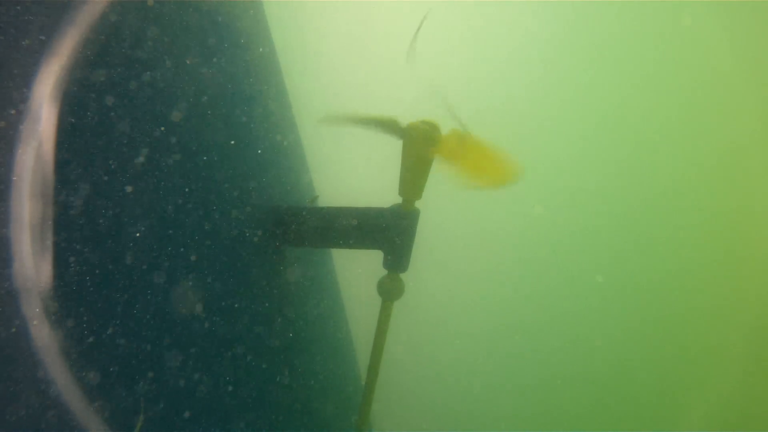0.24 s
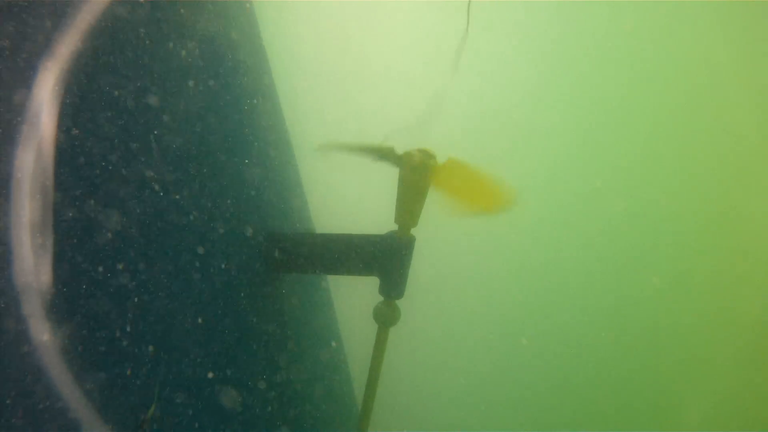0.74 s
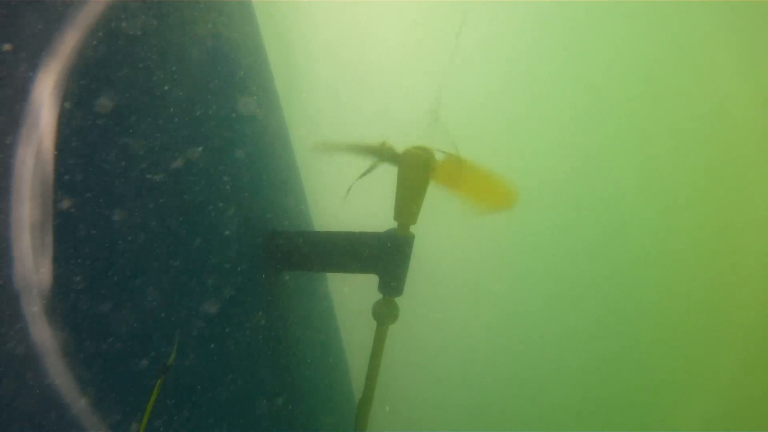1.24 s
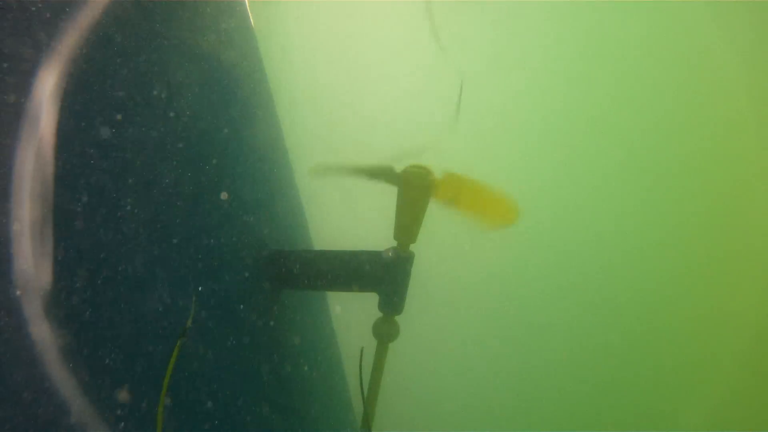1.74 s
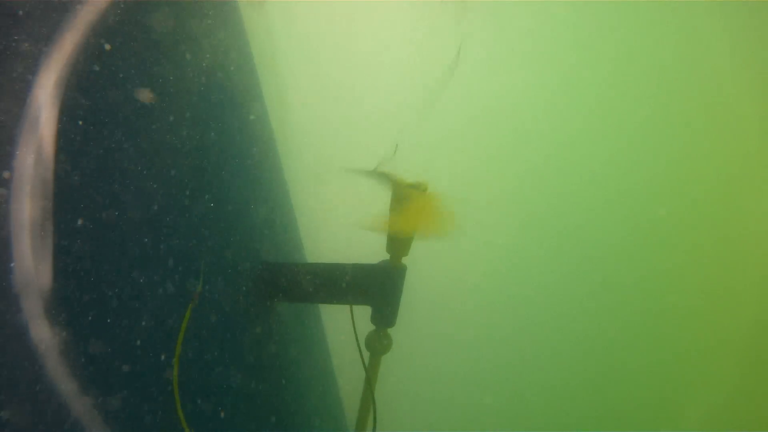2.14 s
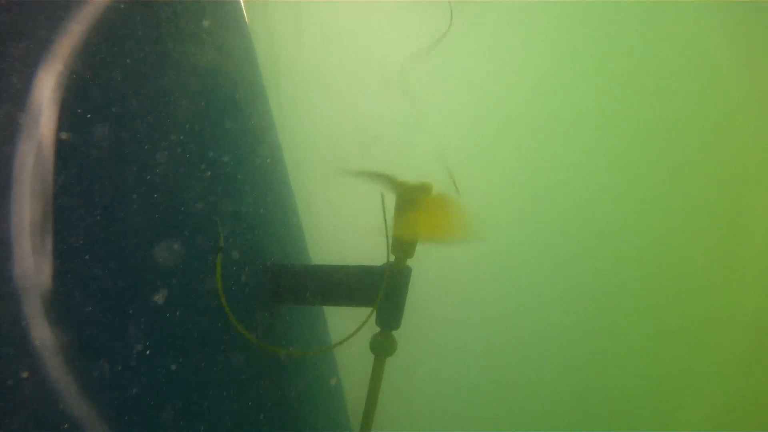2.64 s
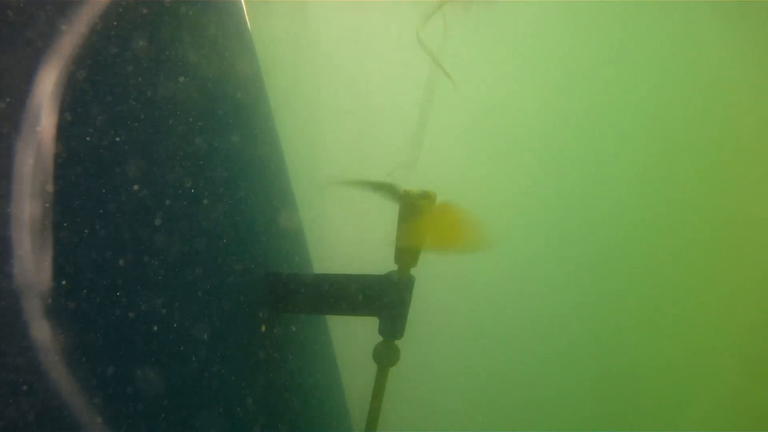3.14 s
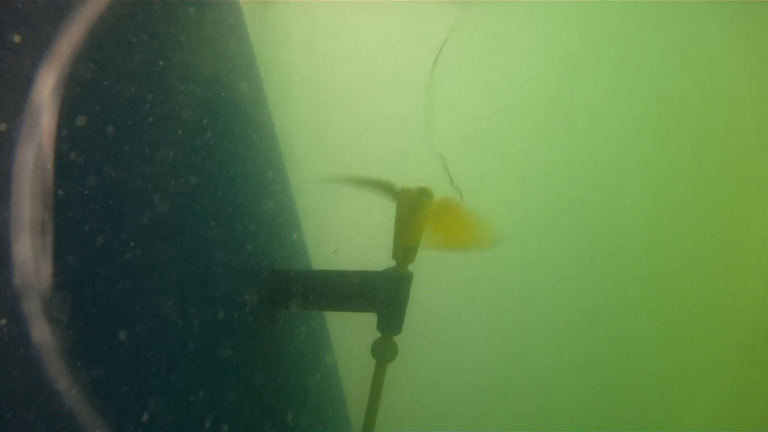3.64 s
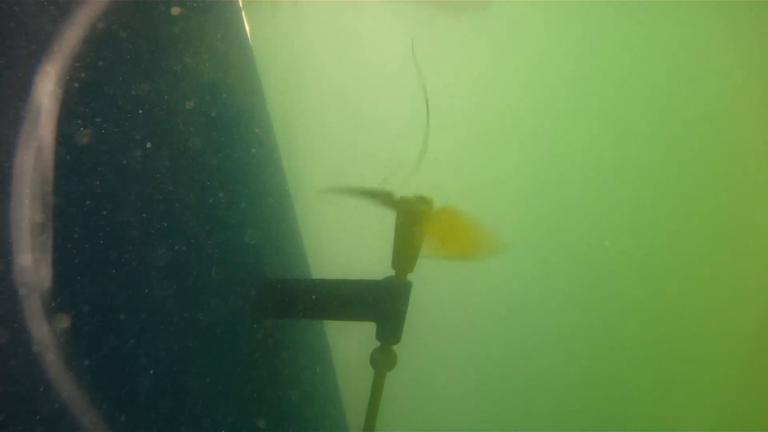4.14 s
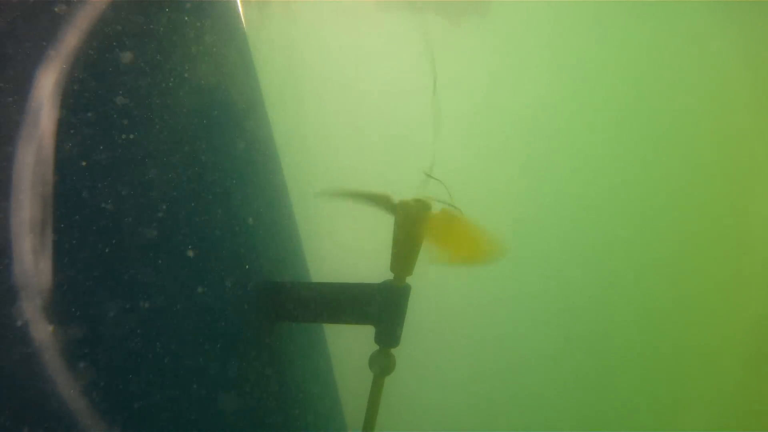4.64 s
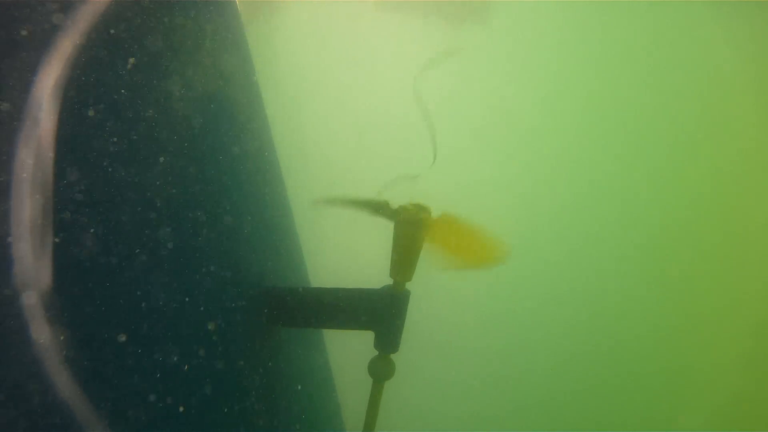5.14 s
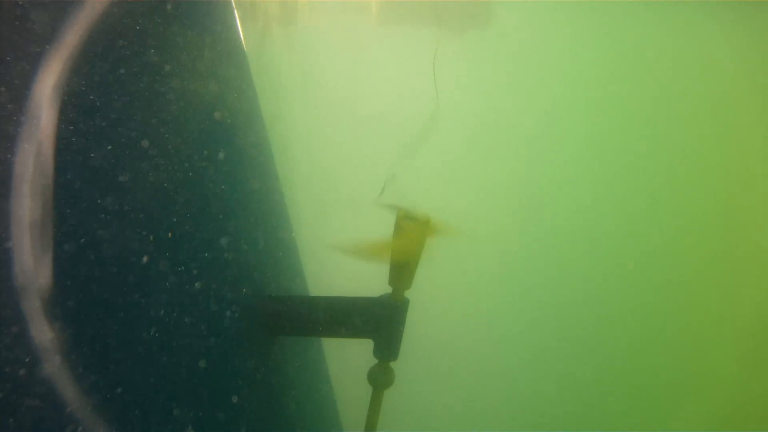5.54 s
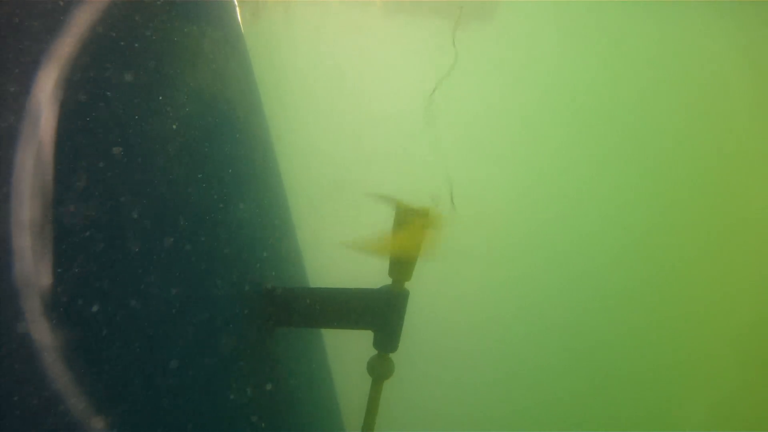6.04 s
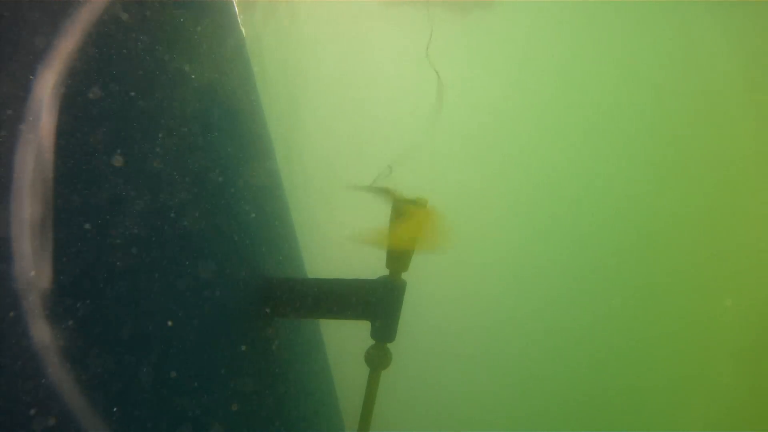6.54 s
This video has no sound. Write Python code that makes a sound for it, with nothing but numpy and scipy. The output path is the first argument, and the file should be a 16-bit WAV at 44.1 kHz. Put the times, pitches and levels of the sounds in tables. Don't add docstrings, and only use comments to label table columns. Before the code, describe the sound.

Harsh, gritty bubbling roar of a spinning propeller heard close underwater, fluttering rapidly, with hollow thuds, low hull thrum and steady motor drone.

```python
import sys
import numpy as np
from scipy import signal
from scipy.fft import rfft, irfft
from scipy.io import wavfile

SR = 44100
rng = np.random.default_rng(int(sys.argv[2]) if len(sys.argv) > 2 else 0)


def file_out(sig):
    cols = np.atleast_2d(sig).T
    lim = np.clip(cols, -1, 1)
    pcm = np.round(lim * 32767).astype(np.int16)
    wavfile.write(sys.argv[1], SR, pcm)


def invert_db(level):
    return 10 ** (np.asarray(level, dtype=float) / 20)


N = 298998
TIME = np.arange(N) / SR
ENGINE_HZ, SHAFT_HZ = 15.396, 12.94

# t/s, low ring level/dB, high ring level/dB
SURGES = [(0.032, -4, -14), (0.163, -5, -12), (0.372, -3, -15), (0.697, -5, -14), (0.954, -4, -10),
          (1.241, -6, -15), (1.392, -4, -12), (1.842, -8, -7), (1.973, -6, -5), (2.231, -5, -11),
          (2.446, -6, -7), (2.677, -6, -8), (2.707, -4, -17), (3.002, -7, -4), (3.074, -4, -8),
          (3.102, -6, -13), (3.256, -4, -15), (3.462, -4, -12), (3.64, -5, -12), (3.852, -6, -14),
          (4.028, -2, -14), (4.465, -7, -13), (4.635, -6, -8), (4.987, -5, -8), (5.113, -5, -12),
          (5.311, -3, -15), (5.469, -6, -13), (5.575, -2, -11), (6.477, -5, -12), (6.543, -4, -15)]


def rms_one(x):
    return x / np.sqrt(np.mean(x ** 2) + 1e-20)


def drift(rate):
    r = np.exp(-40 * np.pi * rate / SR)
    slow = signal.lfilter([1], [1, -2 * r, r * r], rng.standard_normal(N // 20 + 3002))
    slow = slow[3000:]
    return np.interp(np.arange(N) / 20, np.arange(len(slow)), rms_one(slow - slow.mean()))


def resonate(x, hz, width_hz):
    r = np.exp(-np.pi * width_hz / SR)
    feedback = [1, -2 * r * np.cos(2 * np.pi * hz / SR), r * r]
    return signal.lfilter([(1 - r * r) / 2, 0, (r * r - 1) / 2], feedback, x)


def in_time(rows):
    s, *columns = np.transpose(rows)
    return [np.interp(TIME, s, c) for c in columns]


def humps(rows, fall_share):
    total_db = 0
    for s, db, rise_s in rows:
        side_s = rise_s * np.where(TIME > s, fall_share, 1)
        total_db = total_db + db * np.exp(-.5 * ((TIME - s) / side_s) ** 2)
    return total_db


def collapses(per_s, spread_db):
    sizes = invert_db(spread_db * np.minimum(rng.exponential(1, N), 4)) * rng.choice([-1, 1], N)
    return rms_one(sizes * (rng.random(N) < per_s / SR))


def cavitation(level_db):
    # f/Hz, width/Hz, level/dB, throb once a turn/dB, its lag/turns,
    # throb per blade/dB, its lag/blades
    resonances = [(495.6, 163, -8.5, 4.5, 0.38, -0.5, 0.29), (581.4, 73, 3.5, 1.5, 0.11, 4.5, 0.4),
                  (663, 104, 5.5, 3.5, 0.073, 2.3, 0.41), (729.5, 182, 1, -1.5, 0.22, 0.5, 1),
                  (1370, 290, -1.5, 1.03, 0.91, 1, 0.15), (1794, 260, -6, 0.9, 0.46, 3, 0.081),
                  (2239, 462, 1.5, 1.5, 0.58, 1.75, 0.32), (2695, 250, -11, 0.5, 0.72, 1.5, 0.95),
                  (3387, 385, -7.5, 0, 0.54, 1, 0.47), (4380, 1120, -18, 1, 0.5, 3.5, 0.47),
                  (5180, 3440, -11.5, -0.7, 0.64, -0.4, 0.3)]
    # f/Hz, width/Hz, depth/dB
    cancellations = [(1030, 160, -8.0), (1690, 120, -7.0), (2565, 90, -9.0), (3120, 140, -11.0),
                     (3930, 120, -8.0), (4120, 400, -3.0)]
    near = collapses(2500.5, spread_db=3.5)
    far = collapses(9000.5, spread_db=2.1)
    cloud, out = drift(31.0), 0
    firing_db = .5 * np.cos(2 * np.pi * (3 * ENGINE_HZ * TIME - .15))
    for hz, width_hz, db, turn_db, turn_lag, blade_db, blade_lag in resonances:
        throb_db = turn_db * np.cos(2 * np.pi * (SHAFT_HZ * TIME - turn_lag))
        throb_db = throb_db + blade_db * np.cos(2 * np.pi * (2 * SHAFT_HZ * TIME - blade_lag))
        patch_db = .9 * cloud + .5 * drift(45)
        bubbles = 0.8 * near + 0.59 * np.roll(far, rng.integers(N))
        bubbles = bubbles * invert_db(throb_db + patch_db + firing_db)
        ring = resonate(resonate(bubbles, hz, width_hz), hz, width_hz)
        out = out + invert_db(db) * rms_one(ring)
    for hz, width_hz, depth_db in cancellations:
        out = out - (1 - invert_db(depth_db)) * resonate(out, hz, width_hz)
    return invert_db(level_db - 0.48) * out


def surges(roar):
    out = roar.copy()
    ms = (np.arange(1000) - 500) / SR * 1000
    for (s, low_db, high_db), (pitch, length, turn) in zip(SURGES, rng.random((len(SURGES), 3))):
        swell = np.exp(-.5 * (ms / (1.5 + 1.0 * length)) ** 2)
        low = invert_db(low_db + 1.5) * np.cos(2 * np.pi * ((.58 + .16 * pitch) * ms + turn))
        high = invert_db(high_db - 2) * np.cos(2 * np.pi * (2.15 + .25 * length) * ms)
        start = round(s * SR) - 470
        masked = out[start:start + 1000] * (1 - .7 * swell ** .3)
        out[start:start + 1000] = masked + swell * (low + high)
    return out


def machinery():
    # multiple of the cycle rate, level/dB
    strong_orders = [(2, -33.0), (3, -45.5), (4, -37.6), (5, -46.1), (6, -45.4), (8, -46.9), (10, -45.0),
                     (12, -45.2), (13, -42.3), (18, -45.7), (30, -43.1), (31, -45.7), (32, -43.0),
                     (34, -31.7)]
    faint_orders = [14, 15, 16, 17, 19, 20, 21, 25, 27, 28, 33]
    # f/Hz, level/dB
    whines = [(25.88, -39.0), (56.5, -42.0), (113.0, -51.0), (118.4, -48.0), (135.9, -46.0), (141.3, -51.0),
              (197.8, -52.0), (285.3, -53.0), (439.6, -40.0), (510.6, -35.0), (536.4, -39.0)]
    turn = 2 * np.pi * ENGINE_HZ * TIME + .04 * drift(.6)
    out = 0
    for order, db in list(strong_orders) + [(order, -50) for order in faint_orders]:
        phase = order * turn + rng.uniform(-.8, .8)
        out = out + invert_db(db + 1.5 * drift(2.5)) * np.cos(phase)
    for hz, db in whines:
        phase = 2 * np.pi * (hz * TIME + rng.random()) + 0.81 * drift(1.0)
        out = out + invert_db(db + 1.0 * drift(5.6)) * np.sin(phase)
    return invert_db(4.2) * out


def hull(thrum_db, rumble_db):
    # f/Hz, level/dB per Hz
    water_colour = [
        (14, -30),
        (24, -3.5),
        (50, -8.5),
        (130, -4),
        (230, -11),
        (368, -8),
        (480, -6),
        (620, -32),
    ]
    shake = rng.standard_normal(N) * invert_db(4 * np.cos(2 * np.pi * ENGINE_HZ * TIME))
    thrum = rms_one(resonate(resonate(shake, 59.6, 27), 59.6, 27))
    hz = np.fft.rfftfreq(N, 1 / SR)
    at_hz, db = np.transpose(water_colour)
    colour = invert_db(np.interp(np.log(hz + 1), np.log(at_hz), db, left=-80, right=-80))
    flutter_db = 1.6 * drift(31.0) + 1.5 * np.cos(6 * np.pi * ENGINE_HZ * TIME)
    water = rng.standard_normal(N) * invert_db(flutter_db)
    rumble = rms_one(irfft(rfft(water) * colour, N))
    return invert_db(thrum_db + 1.5) * thrum + invert_db(rumble_db + 2.3) * rumble


def scene():
    # t/s, bubble roar level/dB
    load = [
        (0.0, -20.5),
        (0.05, -24),
        (1.55, -21.5),
        (1.7, -19.5),
        (3.95, -22.5),
        (4.97, -20),
        (5.34, -22),
        (5.99, -19),
        (6.7, -22.5),
        (6.78, -22.5),
    ]
    # t/s, rise/dB
    flares = [(0.37, 3), (2.99, 3.5), (3.54, 2.5), (3.99, 2.5), (4.471, 4.5), (5.0, 0.5), (5.45, -0.5),
              (5.545, 3), (6.44, 0.5)]
    # t/s, rise/dB, length/s
    waves = [
        (0.33, 4, 0.057),
        (1.9, 6.5, 0.42),
        (3.0, 5, 0.63),
        (4.98, 11.5, .15),
        (5.65, 17, 0.11),
        (6.0, 8.5, 0.16),
        (6.5, 13, 0.19),
    ]
    load_db, = in_time(load)
    waves_db = humps(waves, 1)
    flares_db = humps([(s, db, .022) for s, db in flares], 0.29)
    rumble_db = -32.5 + 0.99 * (load_db - load_db.mean()) + 0.19 * waves_db
    propeller = surges(cavitation(load_db + flares_db))
    return (propeller + machinery() + hull(-37 + waves_db, rumble_db))[None]


def ducking(x, knee_db, release_db_s):
    steps = np.zeros(N)
    for s, low_db, high_db in SURGES:
        steps[round(s * SR)] = 0.2953 * min(-11 - max(low_db, high_db), 0)
    after_surges = signal.lfilter([1], [1, -np.exp(-1 / (.07 * SR))], steps)
    over = np.maximum(20 * np.log10(np.abs(x) + 1e-9) - knee_db, 0)
    after_peaks = release_db_s * TIME - np.maximum.accumulate(over + release_db_s * TIME)
    fall = np.exp(-1 / (.001 * SR))
    late = np.roll(np.minimum(after_surges, after_peaks), round(.002 * SR))
    return signal.lfilter([1 - fall], [1, -fall], late)


def low_pass(x):
    return signal.sosfilt(signal.butter(12, 15850, fs=SR, output="sos"), x)


def record(dry):
    x = dry * invert_db(ducking(dry[0], knee_db=-3.0, release_db_s=35.0))
    x = 1.05 * np.tanh(x / 1.05)
    slow = signal.resample_poly(x, 40, 147, axis=1)
    slow = signal.sosfilt(signal.butter(2, 5600, fs=12000, output="sos"), slow)
    slow = slow + invert_db(-58) * rng.standard_normal(slow.shape)
    held = np.repeat(slow, 4, axis=1)
    held = signal.resample_poly(held, 147, 160, axis=1)[:, :N]
    held = signal.sosfilt(signal.ellip(12, .2, 60, 15290, fs=SR, output="sos"), held)
    return low_pass(held)


dry = scene()
out = record(dry)
file_out(out)
```